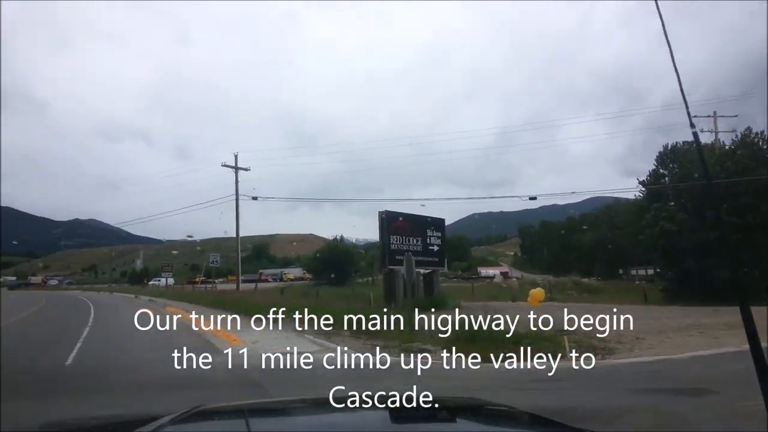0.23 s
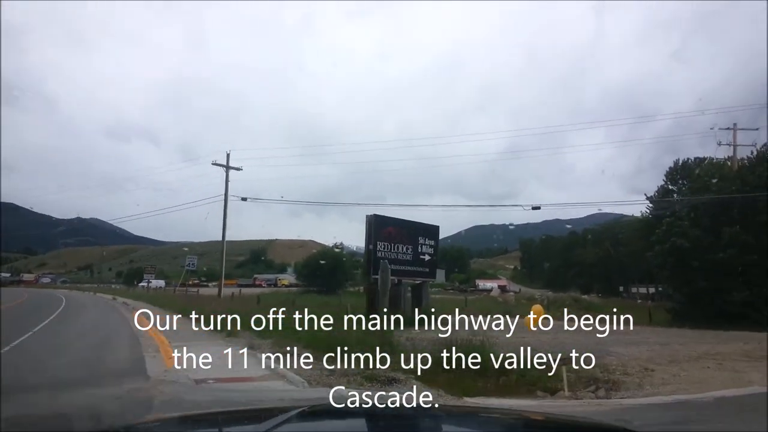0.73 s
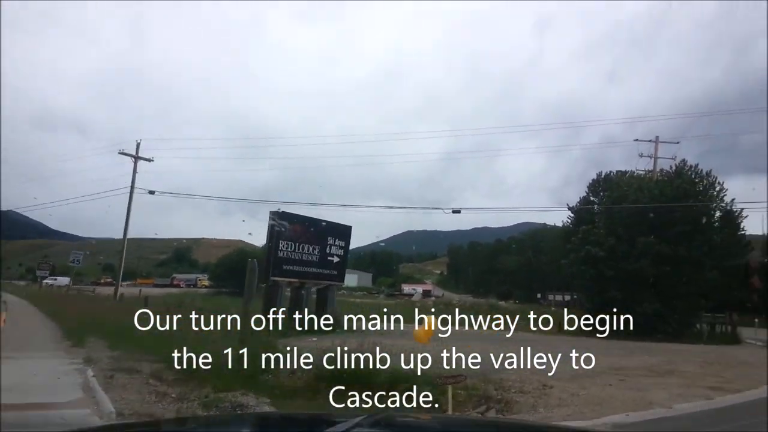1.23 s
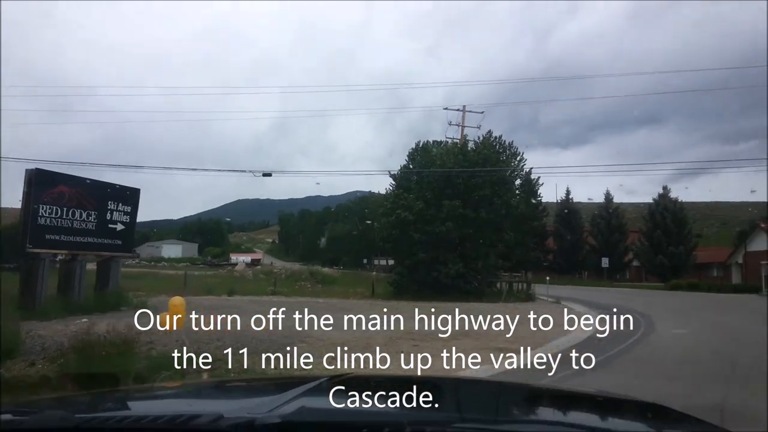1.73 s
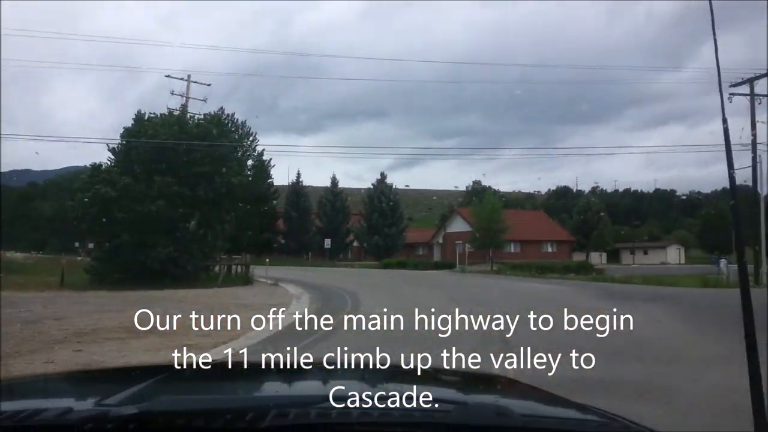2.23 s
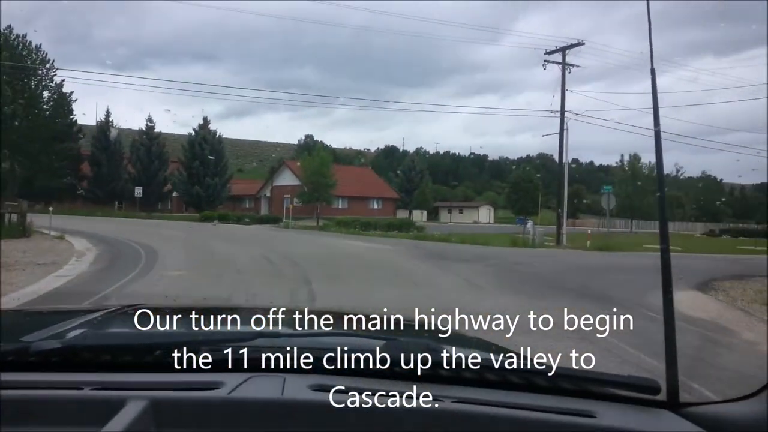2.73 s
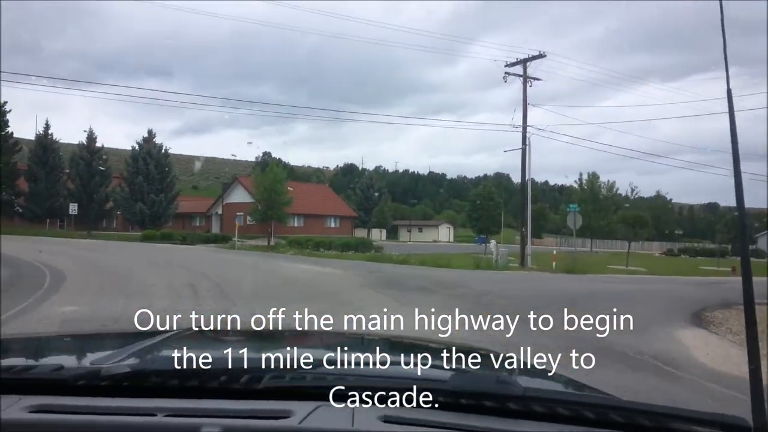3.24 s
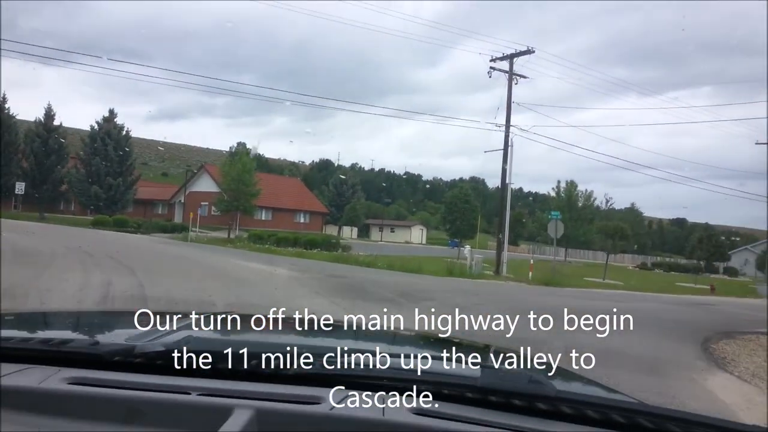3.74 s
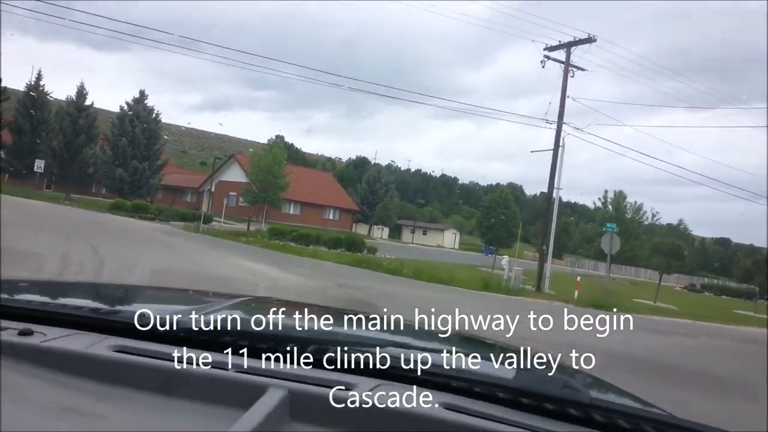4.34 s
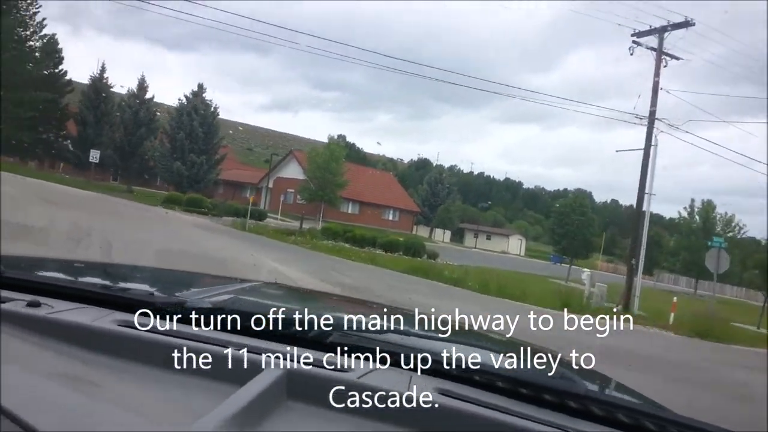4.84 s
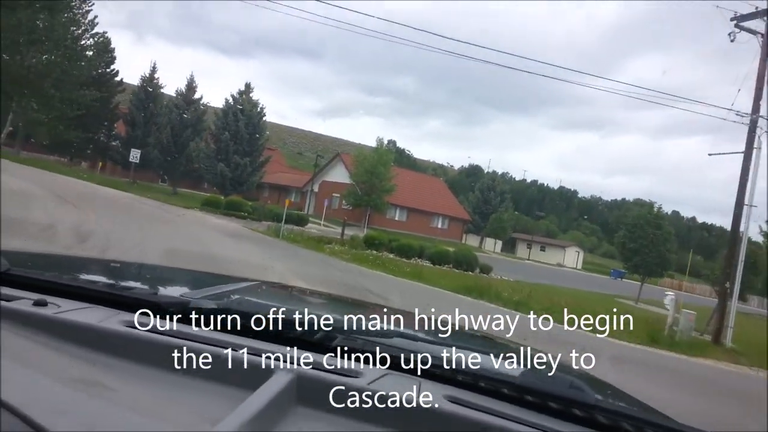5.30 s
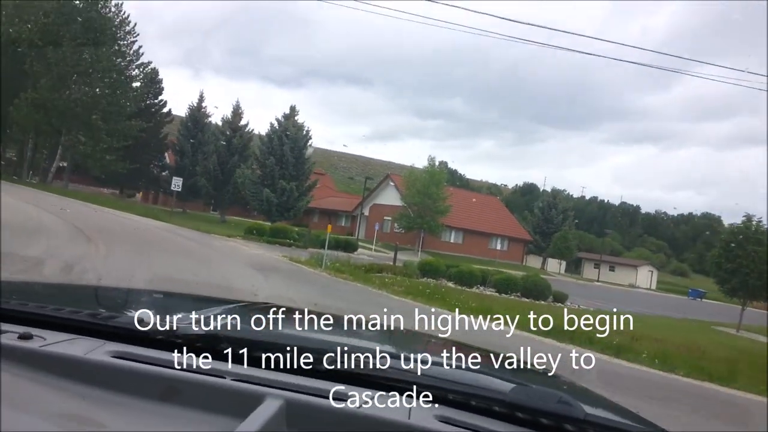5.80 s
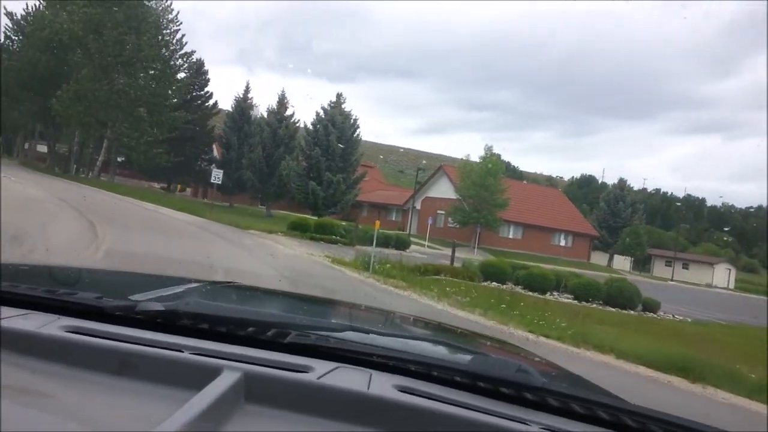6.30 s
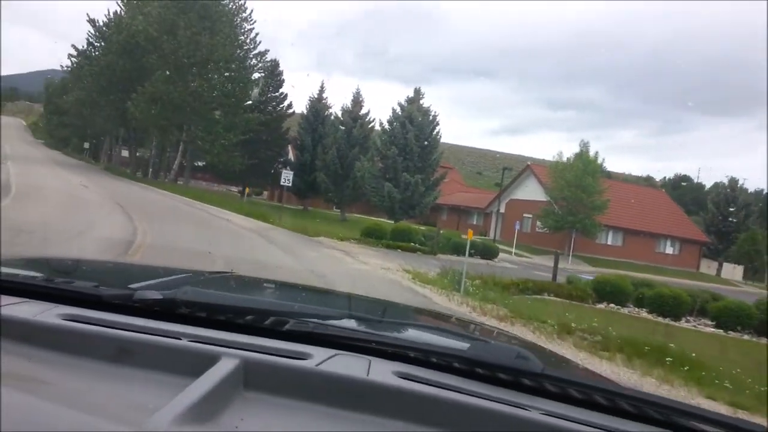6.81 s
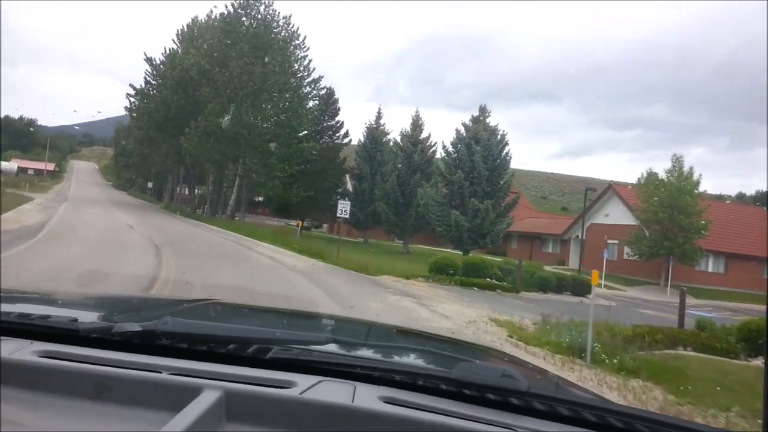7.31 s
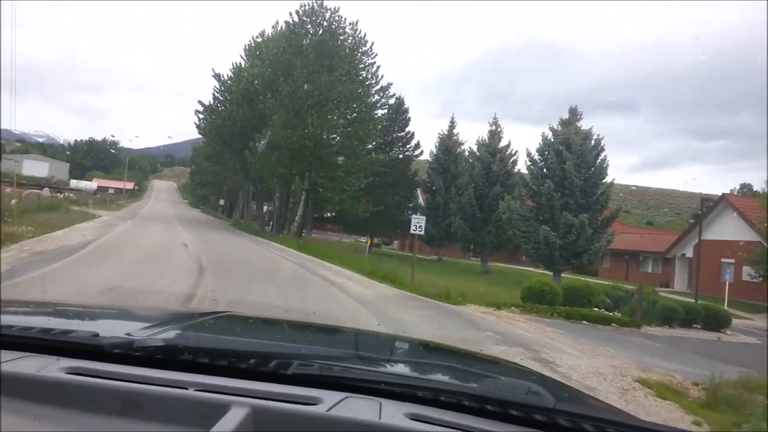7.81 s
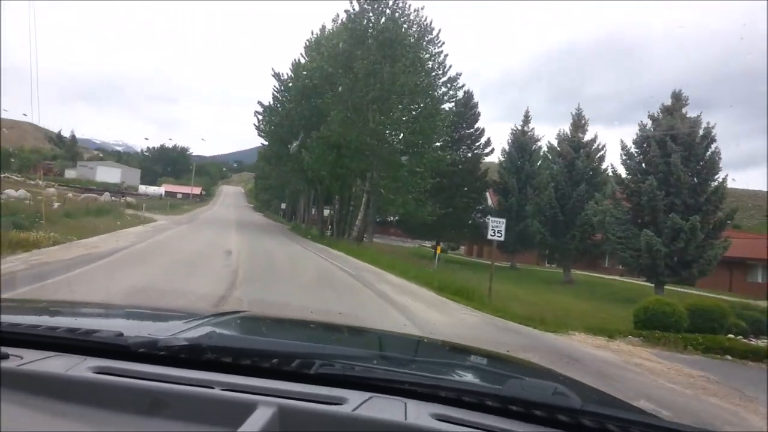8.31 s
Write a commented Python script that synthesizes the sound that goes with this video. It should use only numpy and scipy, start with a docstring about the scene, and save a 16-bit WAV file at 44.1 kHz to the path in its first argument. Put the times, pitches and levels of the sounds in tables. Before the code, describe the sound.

A car slows into a turn, its engine hum sinking while loose trim clicks and chatters and the body thumps over bumps. After about two seconds it accelerates, with a cluster of sharp clicks and a heavy double thud. The rattling thins to occasional knocks, leaving a booming, slowly rising engine drone, tyre rumble and a soft hiss with faint whines. The microphone is inside the cabin.

```python
"""Inside a car that coasts into a turn and then pulls up a gentle hill.
The engine's firings make a boom, a growl and a rush that ring in the cabin and grow with pedal and speed.
Under them the tyres rumble on rough asphalt and air hisses softly, with thin whines as the car pulls.
Mostly in the turn, loose plastic and a small metal catch click, rattle and rustle,
and bumps thud through the body."""
import sys
import numpy as np
from scipy import signal
from scipy.fft import rfft, irfft, next_fast_len
from scipy.io import wavfile
from scipy.ndimage import uniform_filter1d

SR = 44100
rng = np.random.default_rng(int(sys.argv[2]) if len(sys.argv) > 2 else 0)


def pcm_store(signal):
    """Save signal as 16-bit PCM."""
    levels = np.round(np.clip(np.atleast_2d(signal), -1, 1) * 32767)
    wavfile.write(sys.argv[1], SR, levels.astype(np.int16).T)


N = 377055
TIME = np.arange(N) / SR
CYLINDERS = 5
SNAP_RISE_S = .0013  # clicks, knocks and the ping start almost at once

# Modes, the pitches at which the cabin air boosts or weakens a sound: f/Hz, width/Hz, boost/dB
CABIN_MODES = [(175, 11, 8), (181, 11, 5.7), (226, 25, 4), (260, 31, 6.5), (330, 12, 4.5), (345, 16, -7.2),
               (383, 22, 2.4), (415, 12, 11), (446, 15, -2.6), (462, 17, 2), (502, 12, 3.5), (521, 16, 6.0),
               (544, 16, 2.0), (577, 17, 4.4), (596, 10, -5.3), (635, 28, 7.0), (686, 24, 6.1),
               (797, 35, 10), (839, 29, 11.2)]
# How alike left and right are: f/Hz, likeness (1 the same, 0 unrelated, -1 opposite)
LIKENESS = [(60, .99), (170, .98), (290, .75), (450, .55), (700, .4), (1300, -.25), (2400, .05),
            (15000, -.05)]


def boom(cycles, cycle_hz, shake=0.087, side_shift_rad=0.081):
    """The engine's firing tone and its octave swell after the pedal goes down and fill the cabin."""
    # Firing tone, then octave: level with pedal down/dB, change when coasting/dB, lag/s, swell/s
    tones = [(-39, -10.5, 0.38, .2), (-36.5, -18, .15, 0.17)]
    # Low modes of the cabin air: f/Hz, width/Hz, boost/dB
    low_modes = [(66, 6, 2.5), (69.3, 2, -3), (72, 27, 6.5), (137, 2, -8), (139.5, 2, 3), (144.3, 3, -5),
                 (155, 33, 11.5)]
    out = np.zeros((2, N))
    for k, (db, coast_db, lag, swell) in enumerate(tones, 1):
        angle = 2 * np.pi * (k * CYLINDERS * cycles + rng.random())
        level_db = db + coast_db * (1 - pedal(lag, swell)) + peaks(low_modes, k * CYLINDERS * cycle_hz)
        tone = np.cos([angle - side_shift_rad, angle + side_shift_rad])  # reaches the left a little late
        out += gain_of(level_db) * (1 + shake * wander(2.9)) * tone
    return np.sqrt(2) * out


def growl(cycles, cycle_hz, load_db, lift_db=1.6, waver_db=1.6, drift_rad=.3):
    """Unequal cylinders add overtones of the engine cycle; cabin modes boost or weaken each in passing."""
    # Engine overtones: multiple of the cycle rate, base level/dB
    overtones = [(7, -59.4), (8, -51.3), (9, -44.3), (11, -51.1), (12, -54.0), (13, -56.7), (14, -58.6),
                 (15, -50.3), (16, -65.8), (17, -58.6), (18, -56.3), (19, -62.6), (20, -48.2), (21, -52.9),
                 (22, -51.8), (23, -62.1), (24, -52.8), (25, -51.1), (26, -60.0), (27, -52.5), (28, -53.0),
                 (29, -58.3), (30, -51.1), (31, -52.7), (32, -59.2), (33, -54.9), (35, -64.1), (36, -60.9),
                 (37, -59.1), (38, -59.3), (39, -59.7), (40, -60.4), (41, -63.0), (42, -64.3), (43, -66.5),
                 (44, -66.2), (47, -66.3), (48, -66.5), (50, -66.0), (51, -67.0), (53, -67.0)]
    out = np.zeros((2, N))
    hop = 64  # loudness moves slowly, so work it out only every 64 samples
    for k, db in overtones:
        hz = k * cycle_hz[::hop]
        level_db = lift_db + db + load_db[::hop] + peaks(CABIN_MODES, hz) + waver_db * wander(2)[::hop]
        loudness = np.interp(TIME, TIME[::hop], gain_of(level_db))
        angle = 2 * np.pi * (k * cycles + rng.random()) + drift_rad * wander(.6)
        # short waves reach the two sides out of step
        side_shift = np.arccos(np.clip(at_pitch(LIKENESS, hz[-1]), -1, 1)) / 2 * rng.choice([-1, 1])
        out += loudness * np.cos([angle + side_shift, angle - side_shift])
    return np.sqrt(2) * out


def rush(cycles, load_db, base_db=-37.8, load_share=0.9, pulse_depth=0.16, mode_share=0.19):
    """Gas rushes through intake and exhaust, pulsing with each firing and coloured by the cabin."""
    # Spectrum of the rushing gas: f/Hz, level/dB
    colour = [(20, -60), (105, -31), (135, 1.5), (170, -1.5), (200, -7), (280, -13.5), (400, -14),
              (480, -17), (660, -19), (720, -31.5), (830, -15.5), (1000, -30), (1900, -39), (4000, -41)]
    pulse = 1 + pulse_depth * np.cos(2 * np.pi * CYLINDERS * cycles)
    modes = [(hz, width, mode_share * db) for hz, width, db in CABIN_MODES]
    return gain_of(base_db + load_share * load_db) * pulse * noise(colour, modes=modes)


def pedal(lag_s=0, takes_s=0.68, press_s=1.82):
    """The pedal goes down once, mid-turn: how far it, or something lagging it, has moved from 0 to 1."""
    return np.clip((TIME - press_s - lag_s) / takes_s, 0, 1)


def tyres(lumps_db=2.0):
    """Tyres rumble over uneven asphalt, louder where it is coarse."""
    # Rumble along the road: t/s, level/dB
    roughness = [(0, -35), (.9, -34.5), (1.7, -39), (2.25, -33.5), (2.8, -39), (5.5, -38.5), (7.3, -41.5),
                 (8.55, -41)]
    # Spectrum of the rumble: f/Hz, level/dB
    colour = [(10, -43), (35, -55), (48, -20), (63, 3), (78, -0.5), (95, -4), (150, 1), (200, -9.5),
              (240, -5.5), (300, -15), (410, -11.5), (550, -20), (1000, -33.5), (2500, -86)]
    return gain_of(over_time(roughness) + lumps_db * wander(28.0)) * noise(colour)


def thuds(shudder_rise_s=0.004, size=16384):
    """A bump sets the car's body swinging at one low pitch, and its damped panels shudder briefly."""
    # Bumps: t/s, ring level/dB, rise/s, decay/s, f/Hz, shudder level/dB, decay/s, tilt/(dB per octave)
    bumps = [(0.253, -46, 0.0066, 0.091, 170, -33, 0.12, -1), (0.392, -29.5, 0.037, 0.26, 70, -54, .1, -7),
             (0.534, -46, .006, .08, 171, -42, 0.12, 5), (1.122, -22, 0.028, 0.024, 123, -32.5, 0.21, -3),
             (1.261, -41, 0.012, .12, 128, -35, 0.097, -5), (1.48, -34, 0.04, 0.34, 61, -48, .15, 3),
             (1.81, -39, 0.073, 0.33, 177.3, -51, .2, -6), (2.9599, -23, 0.002, 0.14, 152, -29, 0.23, -1),
             (3.024, -24, .006, .07, 164, -38, 0.084, -6), (4.752, -33, 0.0043, .07, 170, -31, 0.14, 4),
             (6.17, -40, .004, .06, 170, -42, .1, -1)]
    # Spectrum of the shuddering panels: f/Hz, level/dB
    colour = [(30, -42), (100, -14), (180, -3), (300, 3), (450, 2), (620, -5), (900, -4), (1200, -28),
              (4000, -58)]
    out, t = np.zeros((2, N)), TIME[:size]

    def swell(rise, decay):
        """Rises evenly, then dies away."""
        return np.minimum(t / rise, 1) * die_away(np.maximum(t - rise, 0), decay)

    for s, db, rise, decay, hz, shudder_db, shudder_decay, tilt_db in bumps:
        ring = gain_of(db) * swell(rise, decay) * np.sqrt(2) * np.sin(2 * np.pi * hz * t)
        shudder = gain_of(shudder_db) * swell(shudder_rise_s, shudder_decay) * noise(colour, size, tilt_db)
        add(out, s, ring + shudder)
    return out


def clicks(crack_db=-.9, echo_db=-14, echo_decay_s=0.27, snap_width_hz=700, size=11025):
    """Loose plastic and a metal catch snap: a crack, a short ring and the cabin's brief echo."""
    # Snaps: t/s, level/dB, decay/s, tilt/(dB per octave), left minus right/dB, metal share (0 to 1),
    # f/Hz near which the plastic rings most
    snaps = [(0.03, -32, 0.045, 7, -3, 0.9, 2990), (0.0384, -28, 0.14, 7, -1.5, 0.52, 2870),
             (.061, -31.5, 0.055, -3, 2, 0.6, 2900), (0.255, -29.5, 0.12, 3, 2, 0.7, 1800),
             (.274, -31, 0.03, 4, 1, 0.65, 3400), (0.409, -24.5, 0.095, 8, -1, 0.2, 2830),
             (0.4774, -30.5, 0.072, 3, 1, 0.9, 1800), (0.541, -38, 0.035, -7, 1, 0, 1900),
             (.575, -46.5, 0.032, 4, 0, 0, 2900), (0.617, -43, 0.036, 0, 1, 0.2, 3460),
             (0.713, -31.5, 0.096, 4, 3, 0.6, 3700), (0.746, -33, 0.039, 4, -3, 0.7, 3700),
             (0.8275, -26, 0.087, 3, -2, 0.36, 2780), (1.1424, -31.5, 0.075, 1.5, -3, 0.1, 1600),
             (1.511, -39, 0.18, -3, -1, 0, 1800), (1.874, -34, 0.088, -0.5, -6, 0.24, 1800),
             (2.245, -37, 0.14, -4, -1, 0.25, 1800), (2.5215, -21.5, 0.061, 0, 1, 0.34, 2800),
             (2.542, -26, 0.091, 0.5, 1, 0.15, 3800), (2.59, -29, 0.14, 6, 0, 0.3, 4000),
             (2.618, -36, 0.16, 3, 0, 0, 3700), (3.814, -34, 0.03, -1, 1, 0.3, 2900)]
    # Spectrum of a snap: f/Hz, level/dB
    colour = [(30, -60), (300, -47), (1100, -8), (1700, 1.5), (2300, -1.5), (3000, -4.5), (5000, -6.5),
              (8000, -12), (11000, -18), (15000, -21)]
    # Modes of the plastic and of the catch: f/Hz, width/Hz, boost/dB
    plastic_modes = [(1520, 110, 4), (1830, 90, 5), (2540, 110, 8), (2760, 120, 9), (2950, 130, 11),
                     (3400, 90, 7), (3740, 120, 8), (4020, 160, 9)]
    metal_modes = [(1670, 130, 6), (4930, 200, 14), (7040, 140, 8), (9560, 130, 8)]
    out, t = np.zeros((2, N)), TIME[:size]
    for s, db, decay, tilt_db, pan_db, metal, centre_hz in snaps:
        struck_band = [(centre_hz, snap_width_hz, 1)]
        modes = [(hz, width, boost * (1 - metal) * (.5 + peaks(struck_band, hz)))
                 for hz, width, boost in plastic_modes]
        modes += [(hz, width, boost * metal) for hz, width, boost in metal_modes]
        crack = noise(colour, size, tilt_db, modes) * gain_of(crack_db) * die_away(t, decay)
        echo = noise(colour, size, tilt_db - 1) * gain_of(echo_db) * die_away(t, echo_decay_s)
        sides = gain_of([[db + pan_db / 2], [db - pan_db / 2]])
        add(out, s, sides * (crack + ringing(modes, t) + echo) * attack(t))
    return out


def ringing(modes, t, ring_db=-3, decay_s=.055, detune=.012):
    """A struck part rings as dying pure tones, tuned a little differently at each blow."""
    tones = 0
    for hz, _, boost_db in modes:
        pitch_hz = hz * (1 + detune * rng.standard_normal())
        turns = pitch_hz * t + .5 * rng.random((2, 1)) + rng.random()  # each side has its own phase
        tones += (gain_of(boost_db) - 1) * np.sin(2 * np.pi * turns)
    return unit_level(tones) * gain_of(ring_db) * die_away(t, decay_s)


def knocks(ring_width_hz=350, ring_db=8, size=11025):
    """The trim (the cabin's lining) gives dull knocks as the body flexes."""
    # Knocks: t/s, level/dB, decay/s, ring f/Hz
    hits = [(.652, -40.5, 0.19, 950), (2.524, -33, 0.076, 1140), (.789, -31, 0.044, 1900),
            (.799, -40, 0.076, 1300), (1.505, -33.5, 0.12, 960), (1.519, -38, 0.06, 1830),
            (4.152, -37, 0.052, 900), (4.344, -37, 0.074, 1800), (4.405, -36, .06, 2120),
            (4.658, -35, 0.12, 920), (4.755, -28.5, 0.054, 1860), (5.979, -33.5, 0.065, 1750)]
    # Spectrum of a knock: f/Hz, level/dB
    colour = [(30, -40), (300, 0), (700, -5), (1000, -3), (1300, -4), (1650, 0), (2200, -3), (2600, -12),
              (4500, -15), (15000, -27)]
    out, t = np.zeros((2, N)), TIME[:size]
    for s, db, decay, hz in hits:
        knock = noise(colour, size, modes=[(hz, ring_width_hz, ring_db)])
        add(out, s, gain_of(db) * attack(t) * die_away(t, decay) * knock)
    return out


def ping(start_s=1.518, hz=2285, db=-45, decay_s=.3, size=11025):
    """A small metal part rings on after one knock."""
    out, t = np.zeros((2, N)), TIME[:size]
    tone = np.sin(2 * np.pi * hz * t)
    add(out, start_s, gain_of(db) * attack(t) * die_away(t, decay_s) * tone[None])
    return out


def rattle(start_s=.53, end_s=.83, ticks_per_s=170, db=-44, decay_s=.02, size=2048):
    """Loose trim chatters in the turn: a dense run of uneven ticks, each ringing briefly."""
    # Spectrum of a tick: f/Hz, level/dB
    colour = [(200, -16), (600, -6), (1000, 8), (1350, -3), (1900, -9), (2800, -4), (4500, -17),
              (15000, -34)]
    during = (TIME > start_s) & (TIME < end_s)
    taps = during * (rng.random(N) < ticks_per_s / SR) * rng.uniform(-0.6, 1, N)
    tick = noise(colour, size) * die_away(TIME[:size], decay_s)
    chatter = signal.oaconvolve(taps[None], tick, axes=1)[:, :N]  # one tick at every tap
    return gain_of(db) * chatter / chatter[:, during].std()


def rustle(grain_db=2.46):
    """Loose things slide, catching and slipping in a grainy rustle."""
    # Slides: peak t/s, level/dB, swell/s, fade/s
    slides = [(.18, -47, 0.14, 0.02), (.38, -45.5, 0.18, 0.093), (.64, -49.5, 0.15, 0.17),
              (.80, -40, 0.025, 0.024), (1.09, -45, 0.12, 0.21), (1.45, -54, .025, 0.11),
              (1.95, -48.5, 0.21, 0.061), (4.38, -45, 0.083, 0.21)]
    # Spectrum of the rubbing: f/Hz, level/dB
    colour = [(150, 9), (260, 6), (350, 9.5), (520, 5), (1000, 12), (1250, 8.5), (1750, 12.5), (2300, 11),
              (2900, 5.5), (3600, 8), (5500, 2), (9000, -2.5), (15000, -1.5)]
    loudness = sum(gain_of(db) * stroke(s, swell, fade) for s, db, swell, fade in slides)
    return loudness * gain_of(grain_db * wander(29)) * noise(colour, ripple_db=3.5)


def squeak(peak_s=.19, half_length_s=.01, hz=2200, db=-47, waver=0.037):
    """Sliding plastic gives one tiny squeak of unsteady pitch."""
    slips = np.cumsum(hz * (1 + waver * wander(60))) / SR
    return gain_of(db) * stroke(peak_s, half_length_s, half_length_s) * np.sin(2 * np.pi * slips)


def swishes():
    """Surfaces brush smoothly past each other with a soft, high hiss."""
    # Brushes: peak t/s, level/dB, half length/s
    brushes = [(1.268, -48.5, 0.052), (2.216, -48, 0.1), (2.635, -49, 0.36), (3.928, -40.5, 0.024)]
    # Spectrum of the brushing: f/Hz, level/dB
    colour = [(800, -26), (2500, 2), (5000, 0), (8000, 0.5), (12500, 2), (15000, 1.5)]
    return sum(gain_of(db) * stroke(s, half, half) for s, db, half in brushes) * noise(colour)


def air(load_db, cruise_db=-43.5, load_share=0.26, gusts_db=1.17):
    """Moving air makes a faintly whistling hiss that grows as the car pulls."""
    # Spectrum of the hiss: f/Hz, level/dB
    colour = [(200, 8), (800, 8), (1250, 6), (1850, 4.5), (2500, -1.5), (3000, -3), (4000, -5),
              (4600, -5.5), (5200, -8.5), (8000, -10.5), (11000, -12.5), (15000, -17.5)]
    # Whistles in the hiss: f/Hz, width/Hz, boost/dB
    whistles = [(1900, 120, 2.5), (2945, 60, 5), (3320, 80, 3), (3670, 70, 2), (6900, 100, 3),
                (8200, 150, 3)]
    hiss = noise(colour, modes=whistles, ripple_db=1.8)
    return gain_of(cruise_db + load_share * load_db + gusts_db * wander(19.0)) * hiss


def whines(fade_s=0.26, waver_db=0.5):
    """Narrow bands of rushing air fade in one by one during the climb and waver."""
    # Whines: start t/s, end t/s, f/Hz, width/Hz, level/dB
    bands = [(2.0, 9, 4520, 100, -64.5), (3.2, 9, 2200, 40, -61), (4.0, 9, 1560, 50, -62),
             (4.9, 7.7, 3675, 45, -62.5)]
    out = np.zeros((2, N))
    for start, end, hz, width, db in bands:
        band = noise([(hz - 10 * width, -60), (hz, 0), (hz + 10 * width, -60)])
        fade = np.clip(np.minimum(TIME - start, end - TIME) / fade_s, 0, 1)
        out += fade * gain_of(db + waver_db * wander(6.9)) * band
    return out


def noise(colour, size=N, tilt_db=0., modes=(), ripple_db=0.):
    """Stereo noise with a given spectrum (its colour), alike on both sides in the bass."""
    # How much reflections between glass and trim ripple the spectrum: f/Hz, share (0 to 1)
    ripple_share = [(200, 0), (900, 1), (4000, 1), (7000, .5), (15000, .3)]
    length = next_fast_len(size, True)
    hz = np.fft.rfftfreq(length, 1 / SR)
    left, unrelated = rfft(rng.standard_normal((2, length)))
    same = np.clip(at_pitch(LIKENESS, hz), -1, 1)
    right = same * left + np.sqrt(1 - same ** 2) * unrelated
    slope_db = np.clip(tilt_db, -4, 3) * np.log2(hz + 1)  # tilt per octave, limited; plus is brighter
    db = at_pitch(colour, hz) + peaks(modes, hz) + slope_db
    if ripple_db:
        ripple = unit_level(uniform_filter1d(rng.standard_normal((2, len(hz))), size=400, axis=1))
        db = db + ripple_db * ripple * at_pitch(ripple_share, hz)
    return unit_level(irfft(np.array([left, right]) * gain_of(db), length)[:, :size])


def wander(rate, points=2048, points_per_s=200):
    """A smooth random wobble of size about one that changes about rate times a second."""
    hz = np.fft.rfftfreq(points, 1 / points_per_s)
    slow = unit_level(irfft(rfft(rng.standard_normal(points)) * np.exp(-(hz / rate) ** 2)))
    return np.interp(TIME * points_per_s, np.arange(points), slow)


def attack(t):
    """The quick rise of a struck sound, from 0 to 1."""
    return 1 - np.exp(-t / SNAP_RISE_S)


def die_away(t, decay_s):
    """A fade that drops 60 dB in decay_s seconds."""
    return gain_of(-60 * t / decay_s)


def stroke(s, swell, fade):
    """A smooth swell up to time s and a fade after it."""
    return np.exp(-((TIME - s) / np.where(TIME < s, swell, fade)) ** 2 / 2)


def peaks(modes, hz):
    """The boost in dB that a set of modes gives at hz."""
    return sum(db / (1 + (2 * (hz - f) / width) ** 2) for f, width, db in modes)


def at_pitch(points, hz):
    """A table's value at hz, joining its points by lines on an octave scale."""
    f, value = np.transpose(points)
    return np.interp(np.log(hz + 1), np.log(f + 1), value)


def over_time(points):
    """A table's value at every sample, joining its points by lines."""
    return np.interp(TIME, *np.transpose(points))


def gain_of(db):
    """Decibels to amplitude."""
    return 10 ** (np.asarray(db) / 20)


def unit_level(x):
    """Scales a signal to an average (rms) level of one."""
    return x / np.sqrt(np.mean(x ** 2) + 1e-20)


def add(mix, s, sound):
    """Mixes a sound in at time s."""
    part = mix[:, max(round(s * SR), 0):][:, :sound.shape[1]]
    part += sound[:, :part.shape[1]]


def scene(cruise_hz=75, coast_db=-20, load_db_per_octave=11.5):
    """Speed and pedal drive the engine and the hiss; road and cabin add the rest."""
    # Engine speed, falling into the turn and then climbing: t/s, firing f/Hz
    speed = [(0, 80), (1, 62.2), (1.9, 52), (2.05, 54.2), (2.35, 63), (2.5, 64.8), (2.85, 66.1),
             (3.1, 68.4), (3.75, 73.3), (4.35, 73.9), (4.7, 75.5), (5.75, 78.1), (6.75, 79.5), (7.4, 81.6),
             (8.25, 83.3), (8.55, 83.5)]
    firing_hz = over_time(speed)
    # load is how hard the engine works: 0 dB at cruising speed with the pedal down
    load_db = coast_db * (1 - pedal()) + load_db_per_octave * np.log2(firing_hz / cruise_hz)
    cycle_hz = firing_hz / CYLINDERS  # each cylinder fires once a cycle
    cycles = np.cumsum(cycle_hz) / SR
    engine = boom(cycles, cycle_hz) + growl(cycles, cycle_hz, load_db) + rush(cycles, load_db)
    road_and_air = tyres() + air(load_db) + whines()
    loose_parts = rustle() + squeak() + swishes() + rattle() + clicks() + knocks() + ping()
    return engine + road_and_air + loose_parts + thuds()


def record(dry, top_hz=14750):
    """Colours left and right a little differently, then cuts the highest treble."""
    # Balance between the sides: f/Hz, left minus right/dB
    balance = [(60, -0.5), (110, -5), (200, 4.5), (380, -0.5), (700, -3), (1290, -2), (2380, -2), (4400, 4),
               (8120, -5.5), (15000, -1.5)]
    hz = np.linspace(0, SR / 2, 513)
    half_db = at_pitch(balance, hz) / 2
    side_filters = np.array([signal.firwin2(511, hz, gain_of(side * half_db), fs=SR) for side in (1, -1)])
    treble_cut = signal.firwin(511, top_hz, window=("kaiser", 9), fs=SR)
    coloured = signal.oaconvolve(dry, side_filters, "same", axes=1)
    return signal.oaconvolve(coloured, treble_cut[None], "same", axes=1)


dry = scene()
out = record(dry)
pcm_store(out)
```